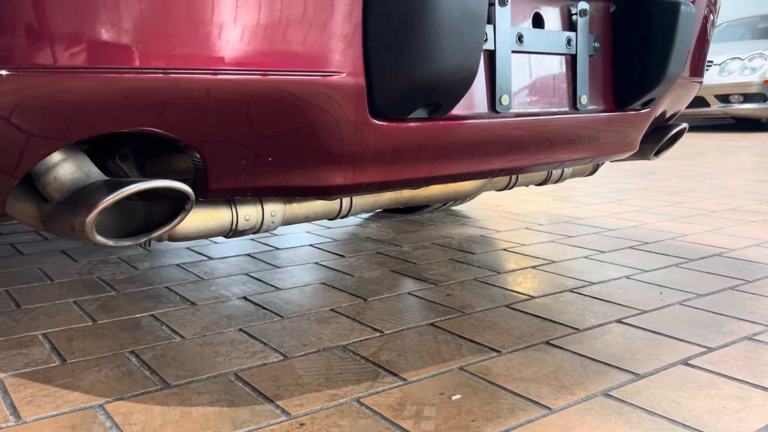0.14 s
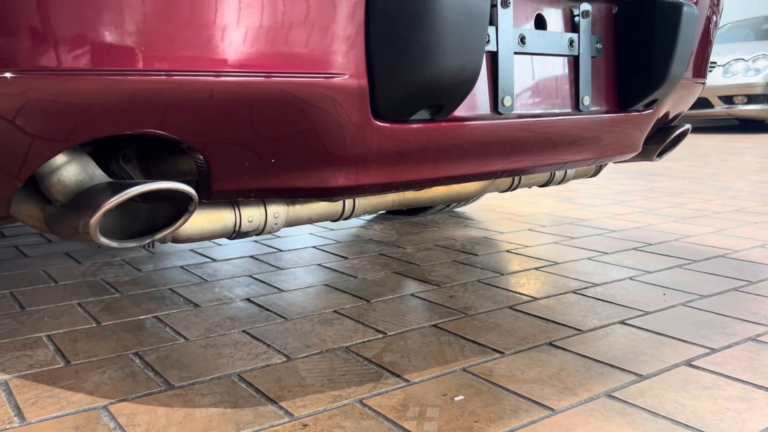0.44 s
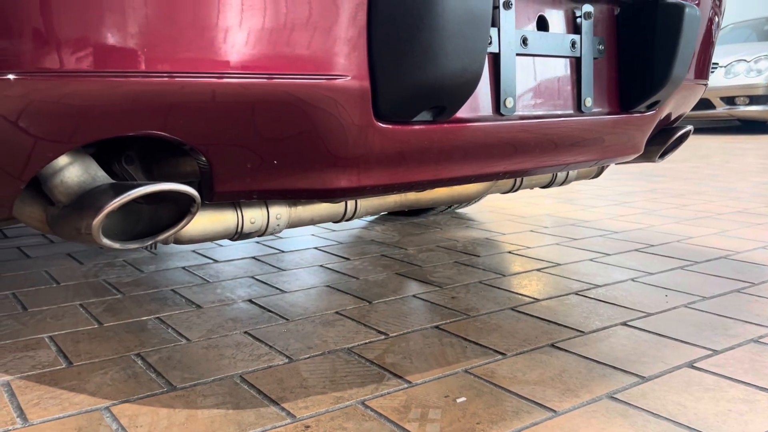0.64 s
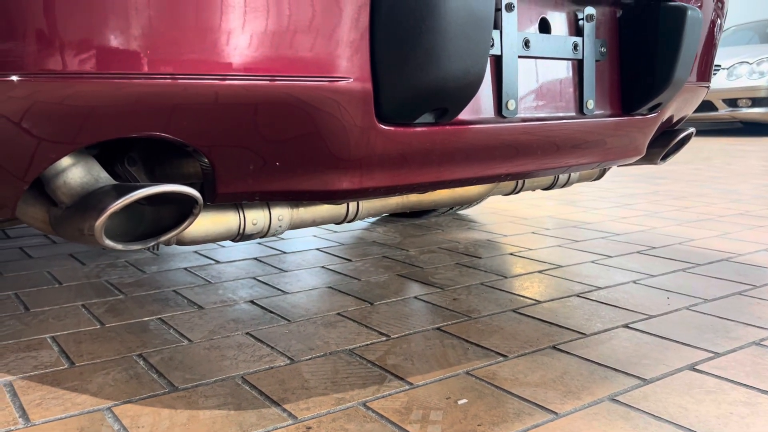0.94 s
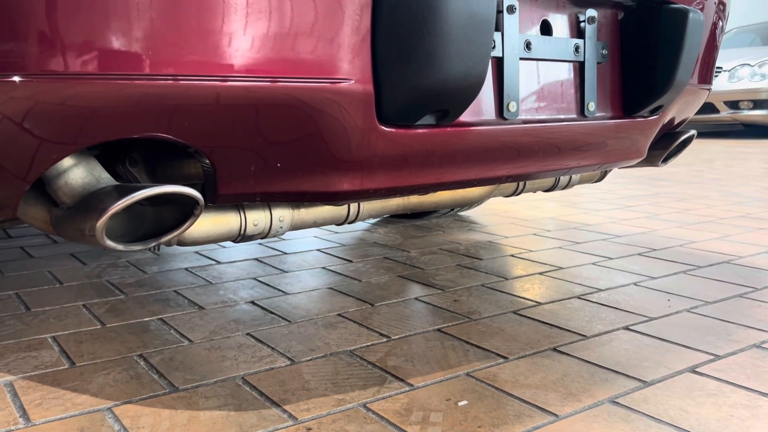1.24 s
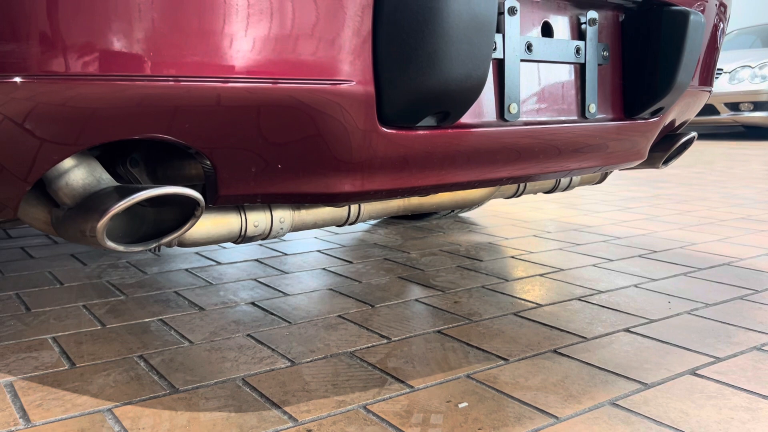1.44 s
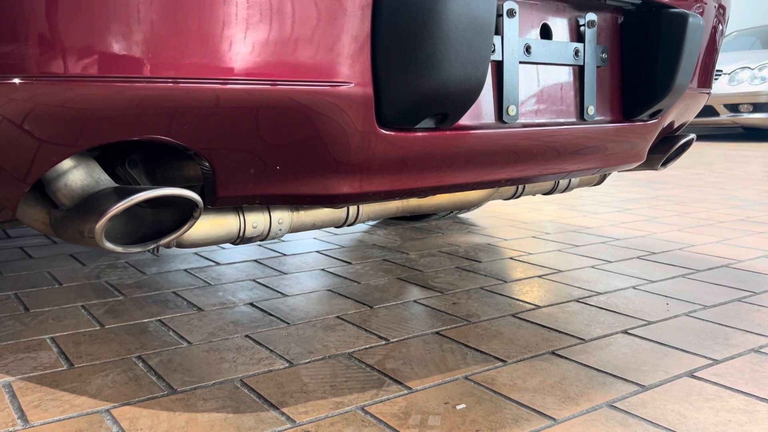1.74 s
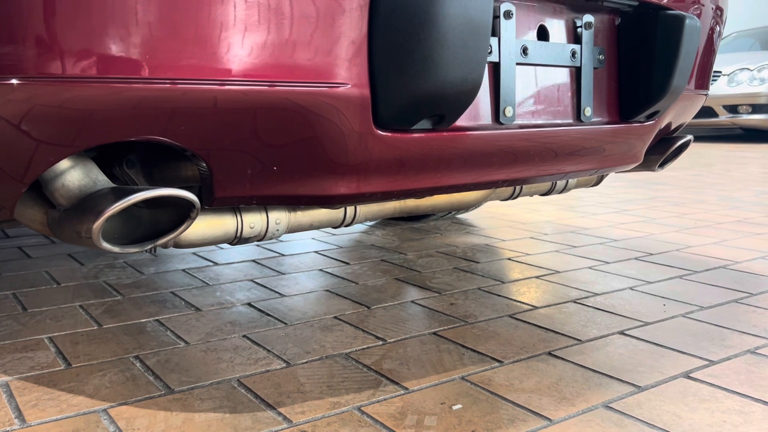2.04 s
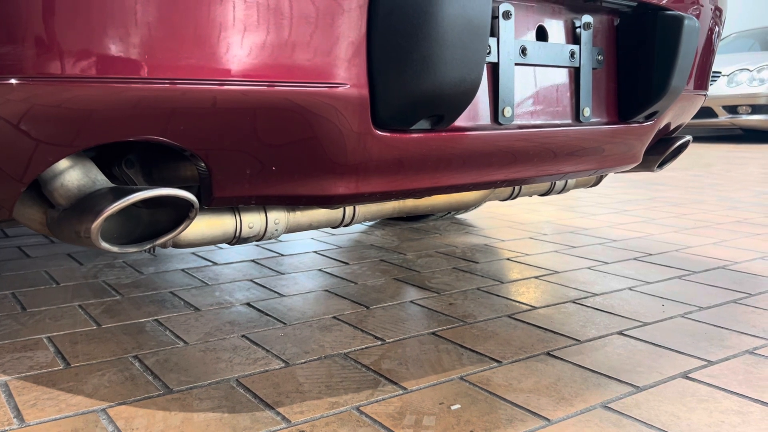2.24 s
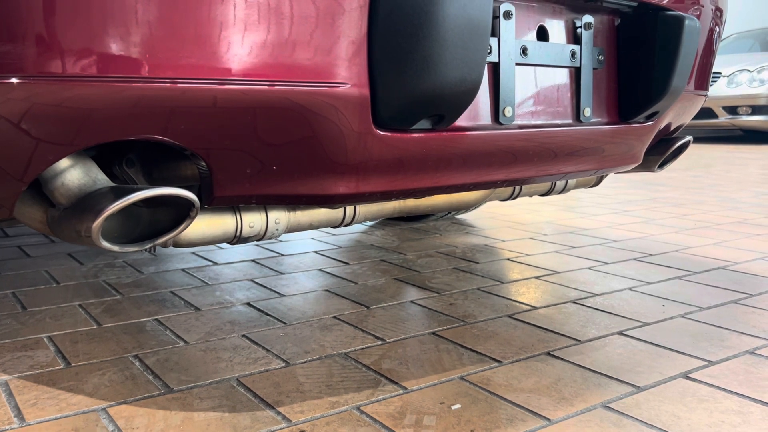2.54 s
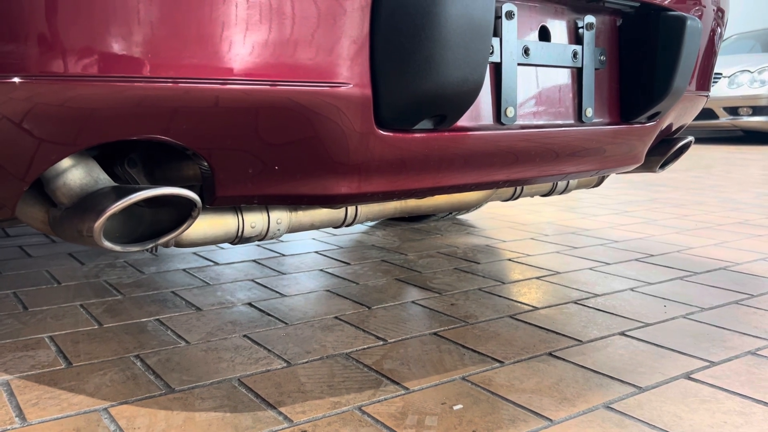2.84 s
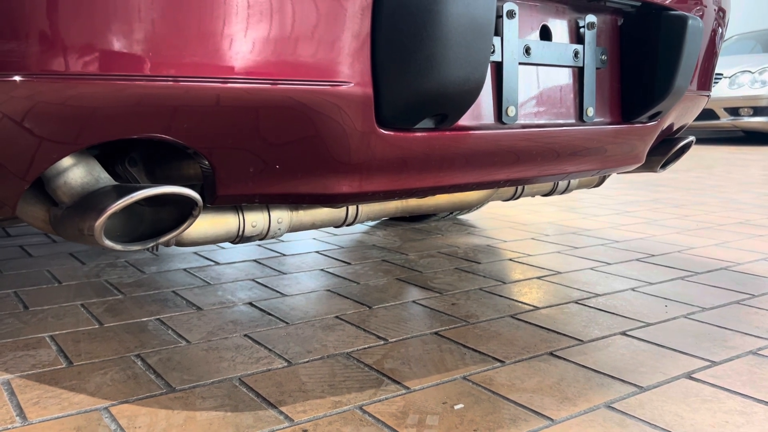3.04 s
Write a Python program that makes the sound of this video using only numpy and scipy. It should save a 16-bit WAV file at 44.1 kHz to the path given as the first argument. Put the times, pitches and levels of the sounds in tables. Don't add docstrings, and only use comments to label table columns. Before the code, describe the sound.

A car engine's exhaust roars briefly, sinks within a second, then idles with a deep boom and hiss.

```python
import sys
import numpy as np
from scipy import signal
from scipy.fft import rfft, irfft
from scipy.io import wavfile
from scipy.ndimage import uniform_filter1d

SR = 44100
rng = np.random.default_rng(int(sys.argv[2]) if len(sys.argv) > 2 else 0)


def to_linear_factor(level_db):
    exponent = np.asarray(level_db, float) / 20
    return 10 ** exponent


def wrap_up_sound(samples):
    columns = np.atleast_2d(samples).T
    tamed = np.clip(columns, -1, 1)
    steps = np.round(tamed * 32767).astype(np.int16)
    wavfile.write(sys.argv[1], SR, steps)


N = 141120
T = np.arange(N) / SR
HZ = np.maximum(np.arange(N // 2 + 1) * SR / N, 1.)


def at_hz(points, hz):
    points = np.array(points)
    return np.interp(np.log(hz), np.log(np.maximum(points[:, 0], 1)), points[:, 1])


def drift(rate_hz):
    step = 40
    pole = np.exp(-2 * np.pi * step * rate_hz / SR)
    settle = 2000
    white = rng.standard_normal(N // step + settle + 2)
    slow = signal.lfilter([1], [1, -2 * pole, pole * pole], white)[settle:]
    return np.interp(np.arange(N) / step, np.arange(len(slow)), slow / slow.std())


def fade(start_s, end_s):
    fade_s = 0.12
    nearest_end = np.minimum(T - start_s, end_s - T)
    return np.clip(nearest_end / fade_s + 0.5, 0, 1) ** 2


def tone(db, turns):
    return np.sqrt(2) * to_linear_factor(db) * np.sin(2 * np.pi * (turns + rng.random()))


def orders(rate, boom_db, other_db):
    # (order of bank rate [1], idle level [dB], falling level [dB], flare level [dB])
    order_levels = [(1, -52, -31, -21), (3, -30, -49, -26.5), (4.16, -37, -20.5, -24.5),
                    (5, -32.5, -26.5, -37), (6, -35, -38, -38), (7, -34.5, -50, -25.5),
                    (8.007, -41.5, -38, -35.5), (8.984, -42, -46, -23.5), (10, -61, -32.5, -36),
                    (11, -45, -38, -48), (12, -46.5, -36.5, -43.5), (13, -40.5, -37, -36),
                    (14, -50.5, -44.5, -44), (15, -38.5, -51, -35), (16, -38.5, -49, -64),
                    (17, -45.5, -44, -38), (18, -46.5, -55, -45), (19, -41.5, -43, -49),
                    (21, -75, -59, -30), (25, -47.5, -54, -29), (28, -47.5, -39, -31),
                    (31, -45.5, -51, -57)]
    # idle, falling, flare [Hz]
    speeds_hz = [28, 35, 42.5]
    waver_db, waver_rad, waver_hz = 0.97, 0.033, 4.6
    turns = np.cumsum(rate) / SR
    out = tone(boom_db + 0.13 * drift(waver_hz), 2 * turns)
    for order, *levels in order_levels:
        db = np.interp(rate, speeds_hz, levels) + other_db + waver_db * drift(waver_hz)
        uneven_turns = turns + waver_rad / (2 * np.pi) * drift(waver_hz)
        out = out + tone(db, round(order) * uneven_turns)
    return out


def echoes():
    echo_db, shortest_s, longest_s = -22, 0.00098, 0.012
    lag = rng.uniform(shortest_s, longest_s, (10, 1))
    size = rng.normal(0, 1, (10, 1))
    reflected = np.sum(size * np.exp(-2j * np.pi * HZ * lag), axis=0)
    comb = 1 + to_linear_factor(echo_db) * reflected * HZ / (HZ + 500)
    return comb / np.sqrt(1 + to_linear_factor(2 * echo_db) * np.sum(size ** 2))


def gas(rate, flow_db, patchy_db, puff_db):
    # (frequency [Hz], density [dB per Hz])
    rumble = [(22, -6), (40, 14.5), (110, 14), (250, 9.5), (380, 10), (520, 6.5), (1050, 7.5), (1350, 2.5)]
    # (frequency [Hz], density [dB per Hz])
    rush = [(1600, 5.5), (1900, 0), (3000, -0.5), (4500, -5.5), (6800, -6.5), (9500, -8), (12500, -14.5),
            (15500, -16)]
    # (frequency [Hz], gain [dB])
    flow_colour = [(40, 2), (150, -4.5), (500, -3), (1000, -1.5), (2000, 1), (4000, -.5), (7000, 4.5),
                   (14000, 1.5)]
    # (frequency [Hz], width [Hz], gain [dB])
    hollows = [(711, 44, 2.5), (890, 40, 1.5), (1900, 163, 4), (2320, 43, 3.5), (2894, 190, 3),
               (3890, 300, 3), (4510, 120, 4.5), (6470, 300, 2.5)]
    gas_db = -6
    throb_hz, throb_peak_s, throb_db, throb_from_hz = 10.25, 2.37, 2.3, 7900

    shape = to_linear_factor(gas_db + 14 + at_hz(rumble + rush, HZ)) * (HZ > 15)
    shape *= to_linear_factor(sum(db / (1 + (2 * (HZ - hz) / width) ** 2) for hz, width, db in hollows))
    white = rfft(rng.standard_normal((3, N))) * shape * echoes()

    full = np.clip((flow_db - flow_db.min()) / np.ptp(flow_db), 0, 1)
    throb = throb_db * np.cos(2 * np.pi * throb_hz * (T - throb_peak_s))
    throb = throb * (1 + 0.28 * drift(1.5)) + 1.54 * drift(32.0)
    puff = puff_db * np.cos(4 * np.pi * np.cumsum(rate) / SR)

    out = 0
    place = np.clip(2 * np.log2(HZ / 30), 0, 18)
    for band in range(19):
        hz = 30 * 2 ** (band / 2)
        mask = np.cos(np.pi / 2 * np.clip(place - band, -1, 1)) ** 2
        db = flow_db + full * at_hz(flow_colour, hz) + patchy_db * drift(9.4) + puff
        db = db + throb / (1 + (throb_from_hz / hz) ** 3)
        out = out + to_linear_factor(db) * irfft(white * mask, N)
    return out


def whines(rate):
    # (multiple of bank rate [1], level [dB], start [s], end [s])
    accessories = [
        (47.75, -45, 1.2, 1.7),
        (47.75, -40, 1.7, 3.6),
        (23.8, -48, 1.0, 3.6),
        (63.6, -53, .9, 3.6),
        (63.6, -40, .57, .81),
        (16.5, -39, .5, .68),
        (15.9, -41, .88, 1.35),
        (42, -40, -.3, .22),
    ]
    turns = np.cumsum(rate) / SR
    out = 0
    for multiple, db, start_s, end_s in accessories:
        wavering_turns = multiple * turns + 0.043 * drift(3.9)
        out = out + fade(start_s, end_s) * tone(db + 1.2 * drift(4.1), wavering_turns)
    return out


def pump():
    start_s, start_hz, rise_hz_per_s, pump_db = 1.35, 2234, 16, -45
    turns = np.cumsum(start_hz + rise_hz_per_s * (T - start_s)) / SR
    return fade(start_s, 9) * tone(pump_db + 0.8 * drift(6.56), turns + 0.034 * drift(7.6))


def hum():
    hum_hz, hum_db = 100.15, -31
    return tone(hum_db + 0.81 * drift(2.8), hum_hz * T)


def ports(shared, left, right):
    # (frequency [Hz], left lead [rad])
    phase_low = [(40, 0.1), (150, 0.1), (1000, 0.5), (1300, 0.13), (1580, 3), (1750, 5), (2300, 7),
                 (3000, 7)]
    # (frequency [Hz], left lead [rad])
    phase_high = [(4500, 6.9), (6000, 7.0), (7100, 6.25), (8800, 3.7), (10700, 2.6), (11700, .5),
                  (13700, -.4), (15300, -3.2)]
    # (frequency [Hz], share [0-1])
    diffuse = [(50, 0.32), (250, 0.3), (700, 0.42), (1400, 0.76), (2000, 0.06), (4500, 0.46), (7000, 0.11),
               (14000, 0.05)]
    # (frequency [Hz], left over right [dB])
    left_db = [(50, 1.0), (500, 1), (2500, 1.2), (6000, 1.8), (9000, -0.5)]
    phase = np.interp(HZ, *np.transpose(phase_low + phase_high))
    loose = np.clip(at_hz(diffuse, HZ), 0, 1)
    side = np.array([[0.5], [-0.5]])
    near = rfft(shared) * np.exp(1j * side * phase) * np.sqrt(1 - loose ** 2)
    both = near + loose * rfft([left, right])
    return irfft(both * to_linear_factor(side * at_hz(left_db, HZ)), N)


def scene():
    # (time [s], bank firing rate [Hz], firing boom level [dB],
    # other orders' level [dB], gas flow level [dB])
    engine = [(0.0, 43.43, -13, 3.5, -20.5), (0.12, 43.3, -40, 1.5, -19.5), (0.199, 43.22, -25, -4.5, -23),
              (0.3, 41.25, -34, -1.5, -26), (0.42, 38.26, -29, 1.5, -26.5), (0.52, 35.25, -23, 0.5, -29),
              (0.61, 31.96, -22, 3, -30), (0.69, 29.1, -21.5, -1.5, -31.5), (0.75, 27.04, -21.5, 2, -33),
              (0.84, 26.3, -36, -3.5, -33.5), (0.92, 25.45, -21.5, -2.5, -35),
              (1.16, 23.98, -21.5, -4.5, -35.5), (1.52, 22.53, -16, -2.5, -36),
              (1.8, 23.03, -15, -2, -34.5), (2.1, 23.25, -13.5, 0.5, -34.5), (2.63, 23.15, -14, 0.5, -34),
              (2.902, 23.59, -14.5, 0.5, -33.5), (3.2, 24.0, -15.5, -1, -33)]
    s, *columns = np.transpose(engine)
    curves = [np.interp(T, s, column) for column in columns]
    rate, boom_db, other_db, flow_db = [uniform_filter1d(c, size=2205, mode="nearest") for c in curves]
    shared, left, right = gas(rate, flow_db, patchy_db=1.0, puff_db=0.4)
    near = ports(shared + orders(rate, boom_db, other_db) + hum(), left, right)
    high = whines(rate) + pump()
    side_db, side_lag = -7, 7
    return near + high + to_linear_factor(side_db) * np.roll(high, side_lag) * np.array([[1], [-1]])


def roll_off(x):
    return signal.sosfilt(signal.butter(12, 15440, fs=SR, output="sos"), x)


def record(dry):
    ceiling = 0.95
    rounded = dry / (1 + (dry / ceiling) ** 4) ** 0.3
    return roll_off(rounded)


dry = scene()
out = record(dry)
wrap_up_sound(out)
```